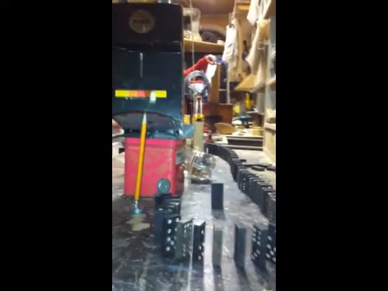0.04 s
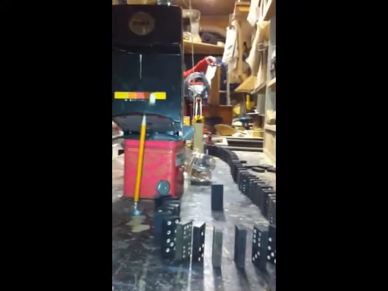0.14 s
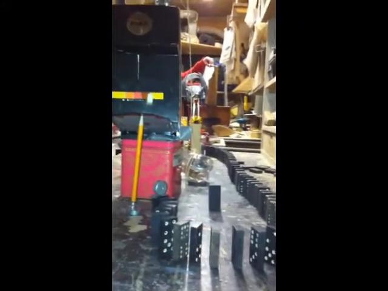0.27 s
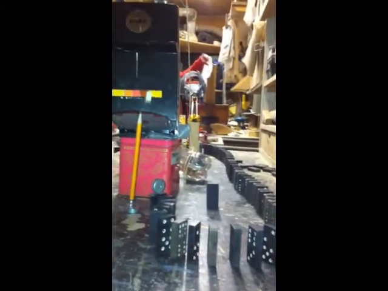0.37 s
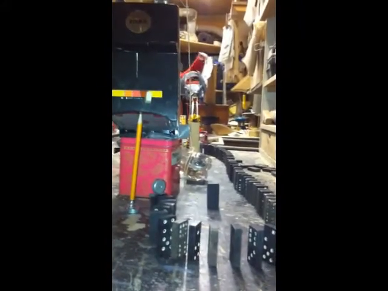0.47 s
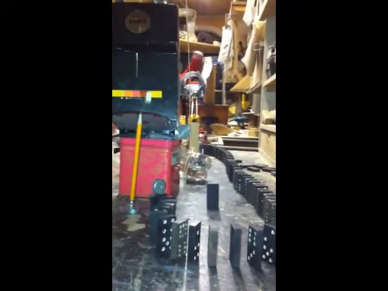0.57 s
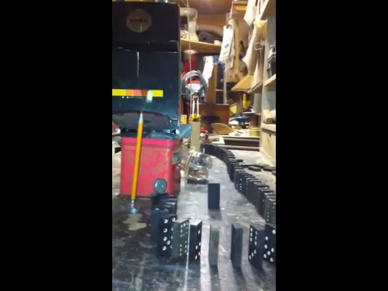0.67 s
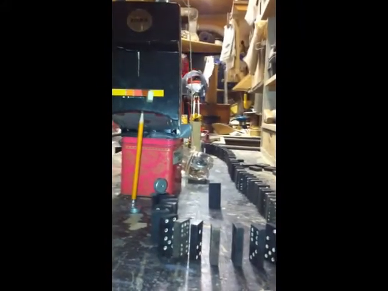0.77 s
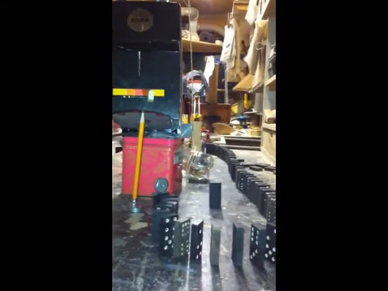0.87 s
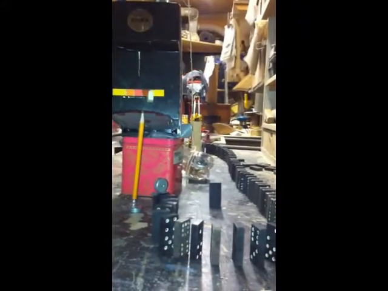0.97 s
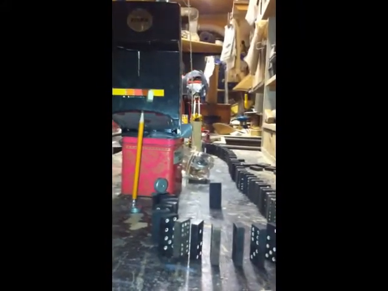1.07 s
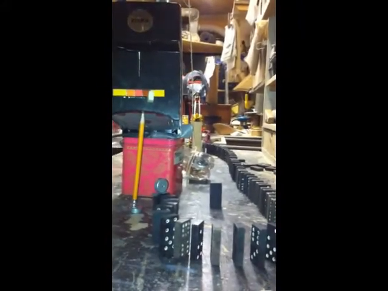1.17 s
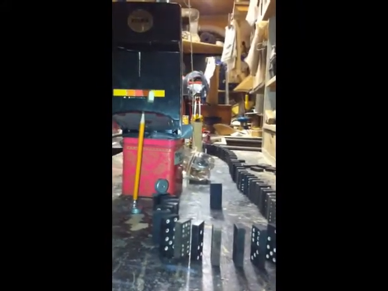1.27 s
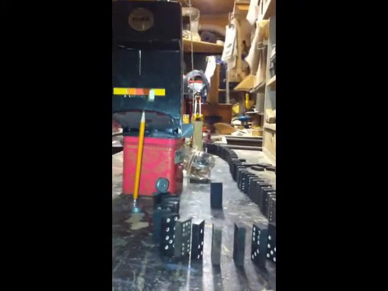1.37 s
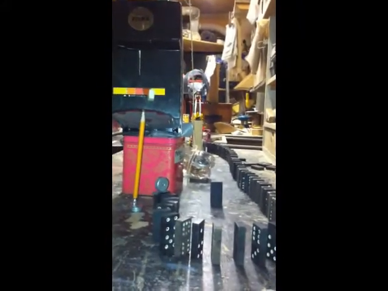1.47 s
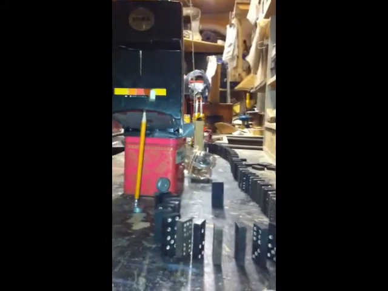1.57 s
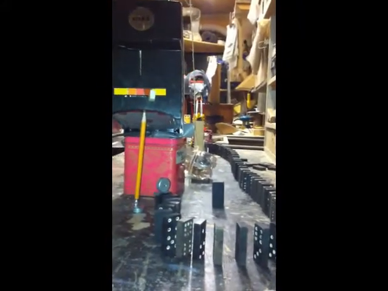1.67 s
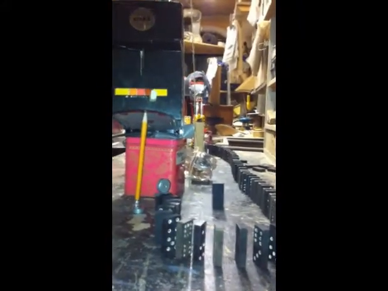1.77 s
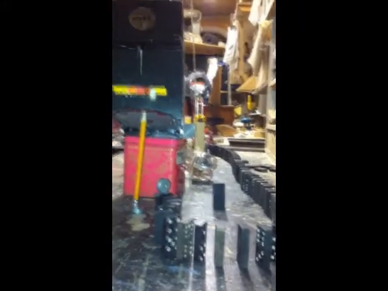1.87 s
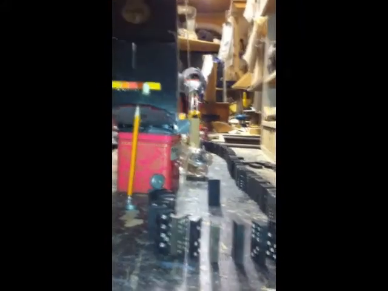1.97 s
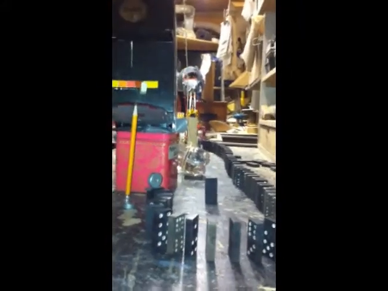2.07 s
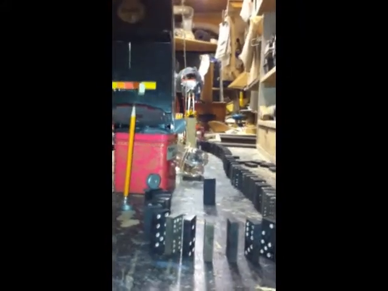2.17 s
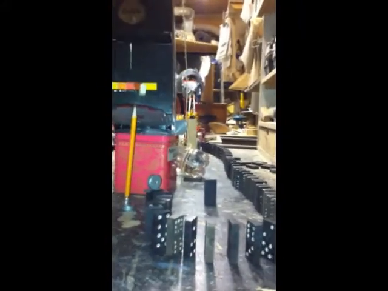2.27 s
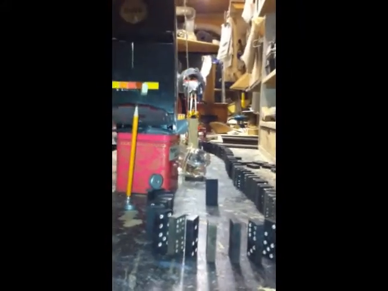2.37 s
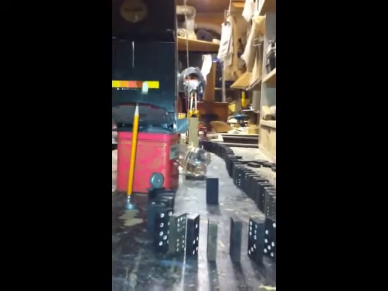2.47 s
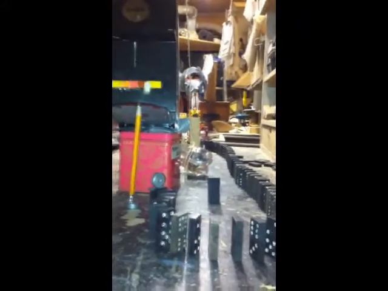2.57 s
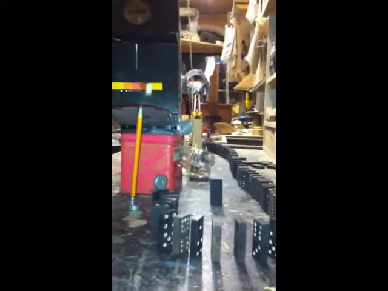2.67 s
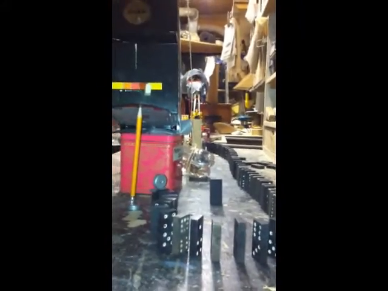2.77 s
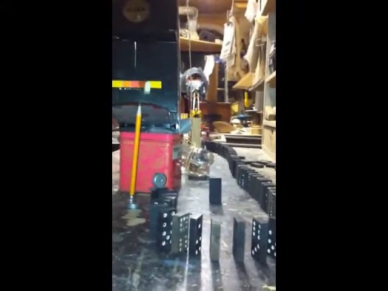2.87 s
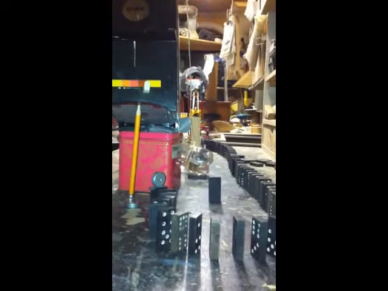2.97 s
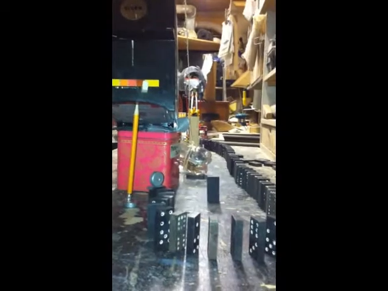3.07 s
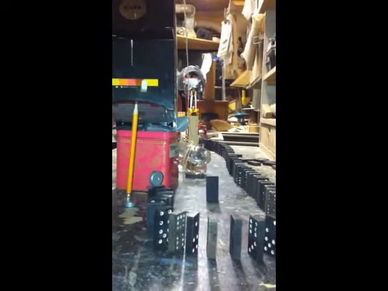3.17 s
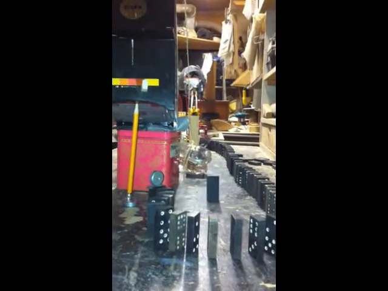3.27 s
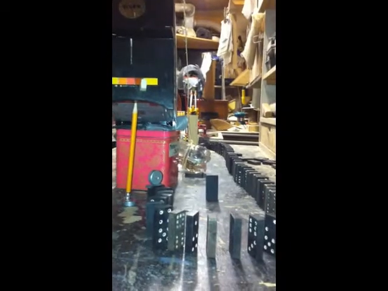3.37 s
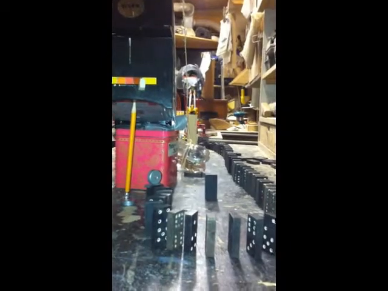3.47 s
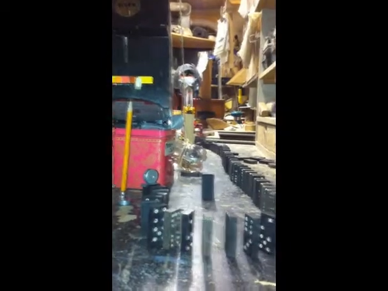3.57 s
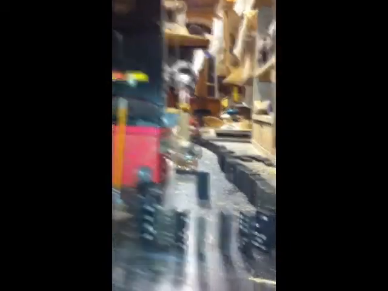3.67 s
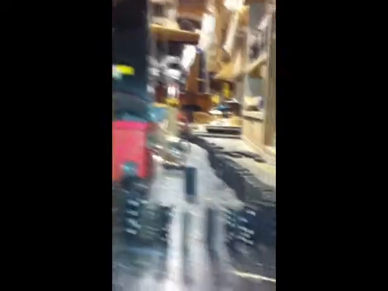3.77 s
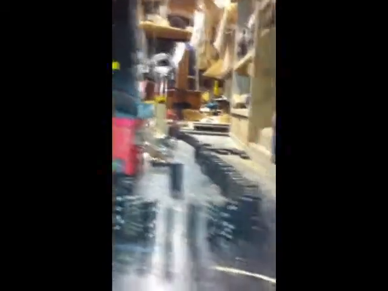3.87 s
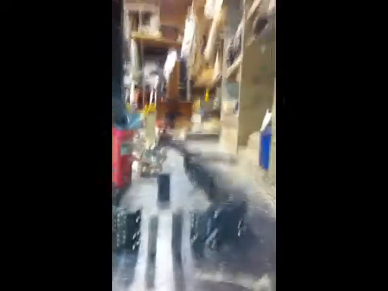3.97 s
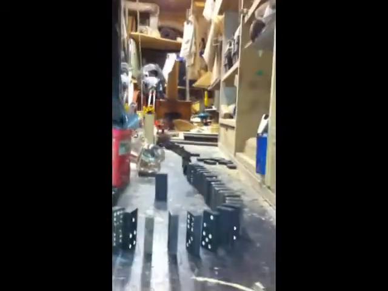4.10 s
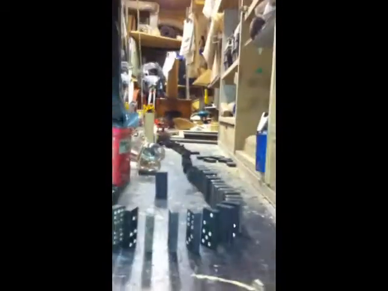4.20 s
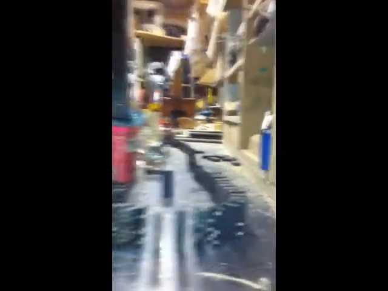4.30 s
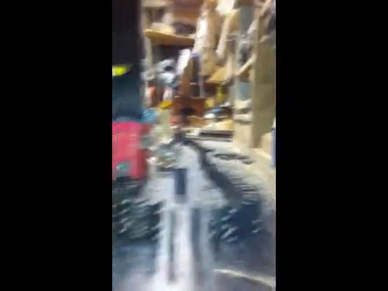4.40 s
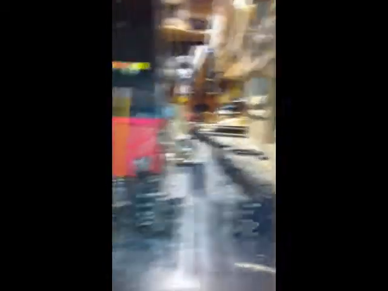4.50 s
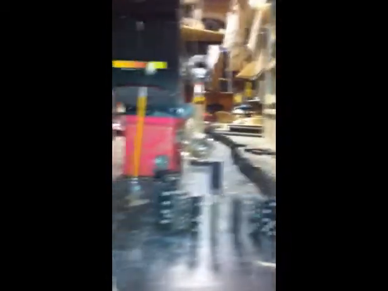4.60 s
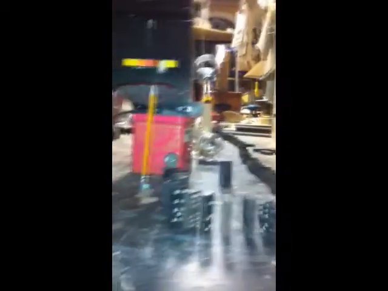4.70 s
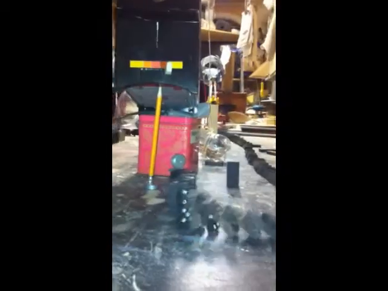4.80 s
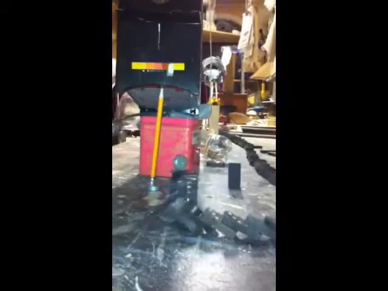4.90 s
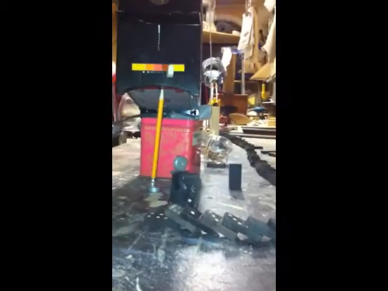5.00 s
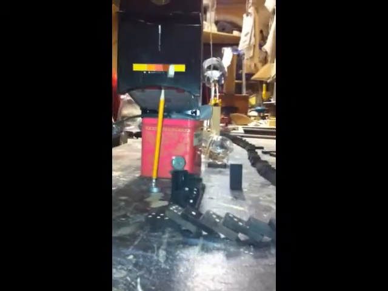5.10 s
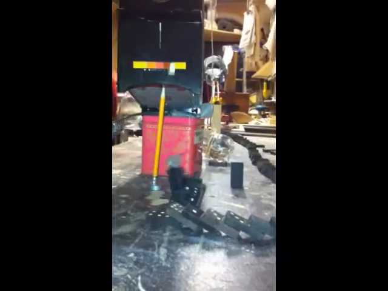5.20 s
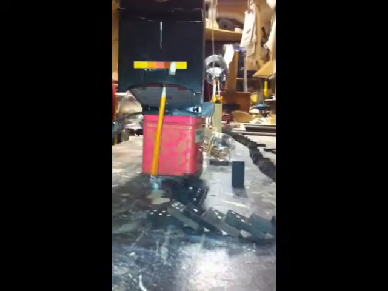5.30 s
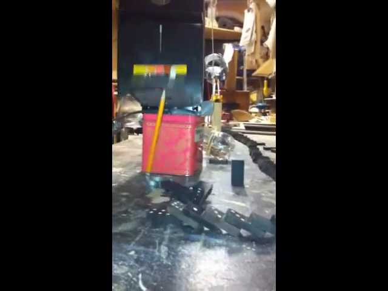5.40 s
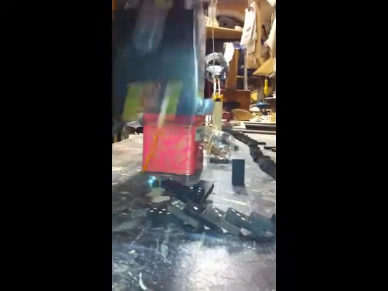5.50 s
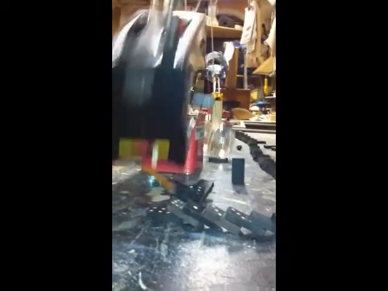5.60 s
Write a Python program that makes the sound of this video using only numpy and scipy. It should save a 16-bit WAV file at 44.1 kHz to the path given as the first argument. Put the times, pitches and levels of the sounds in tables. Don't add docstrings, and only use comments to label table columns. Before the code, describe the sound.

Distant wooden knocks and ticks, a loud accelerating ball bounce, a fast rattling cascade of dominoes on a bench, ending in a hard metallic double bang.

```python
import sys
import numpy as np
from scipy import signal
from scipy.fft import rfft, irfft, next_fast_len
from scipy.io import wavfile
from scipy.ndimage import uniform_filter1d, map_coordinates

SR = 44100
rng = np.random.default_rng(int(sys.argv[2]) if len(sys.argv) > 2 else 0)


def materialize(psi):
    bounded = np.clip(np.atleast_2d(psi).T, -1, 1)
    quanta = np.round(bounded * 32767).astype(np.int16)
    wavfile.write(sys.argv[1], SR, quanta)


def linear_from_db(decibels):
    return 10 ** (np.asarray(decibels, float) / 20)


N = 249165

# resonance in Hz, width in Hz, level in dB.
BENCH_MODES = [(805, 283, -5.5), (1000, 22, -2), (1113, 47, -0.5), (1310, 340, -6.5), (1850, 430, -6),
               (2100, 3600, -19.5)]
# resonance in Hz, width in Hz, level in dB.
FRAME_MODES = [(101, 27, -16), (228, 30, 2), (340.5, 83, 6), (540, 1010, -2)]
# frequency in Hz, level in dB per Hz.
CLICK_COLOUR = [(1200, -19.5), (2500, -4), (3800, 1), (5300, -3), (7500, -4.5), (10000, -17.5),
                (14000, -22.5)]
# frequency in Hz, level in dB per Hz.
RAIL_COLOUR = [(1200, -13), (2500, -7.5), (4000, -4), (5500, -3), (7500, -6), (10000, -11.5), (14000, -21)]


def unit(x):
    return x / np.sqrt(np.mean(x ** 2) + 1e-20)


def along(points, hz):
    f, v = np.transpose(points)
    return np.interp(np.log(hz + 1), np.log(f + 1), v)


def filtered(x, response):
    m = 2 * next_fast_len(x.shape[-1] // 2 + 4096)
    spectrum = rfft(x, m) * response(np.fft.rfftfreq(m, 1 / SR))
    return irfft(spectrum, m)[..., :x.shape[-1]]


def coloured(spectrum):
    def response(hz):
        cepstrum = irfft(np.log(linear_from_db(along(spectrum, hz))))
        cepstrum[1:len(hz) - 1] *= 2
        cepstrum[len(hz):] = 0
        return np.exp(rfft(cepstrum))
    return response


def resonance(f, centre_hz, width_hz):
    return 1j * f * width_hz / (centre_hz * centre_hz - f * f + 1j * f * width_hz)


def body(modes):
    top_hz = 1.6 * modes[-1][0]

    def response(f):
        total = sum((-1) ** k * linear_from_db(db) * resonance(f, c, w) for k, (c, w, db) in enumerate(modes))
        return total / (1 + 1j * f / top_hz) ** 3
    return response


def placed(times, peak_db, sounds):
    at = np.round(np.asarray(times) * SR).astype(int)[:, None] + np.arange(sounds.shape[1])
    sized = sounds / np.abs(sounds).max(axis=1, keepdims=True) * linear_from_db(peak_db)[:, None]
    return np.bincount(at.ravel(), sized.ravel(), N + SR)[:N]


def strikes(times, peak_db, response, t60, blow, rise_s=.0001):
    lead = 40
    t = np.arange(SR // 6) / SR
    chatter = rng.standard_normal((len(times), len(t)))
    chatter *= linear_from_db(-60 * t / np.clip(np.reshape(t60, (-1, 1)), .002, .3))
    chatter *= 1 - np.exp(-t / np.clip(rise_s, 1e-5, .01))
    chatter[:, 0] += blow
    sounds = filtered(np.pad(chatter, ((0, 0), (lead, 0))), response)
    return placed(np.asarray(times) - lead / SR, peak_db, sounds)


def clicks(s, db, shine_db, t60, blow, patchy_db, rise_s=.0001, colour=CLICK_COLOUR):
    # frequency in Hz, level in dB per Hz.
    shine = [(5500, -17.5), (8000, -5.5), (10500, 0), (13000, -3.5), (15300, -8), (16200, -63.5)]
    patches = rng.standard_normal((len(s), 16))

    def patchy(spectrum):
        def response(hz):
            patch = np.array([np.interp(hz, np.linspace(0, SR / 2, len(p)), p) for p in patches])
            return coloured(spectrum)(hz) * linear_from_db(patchy_db * patch)
        return response

    crack = strikes(s, db, patchy(colour), t60, blow, rise_s)
    return crack + strikes(s, db + shine_db, patchy(shine), t60, blow, rise_s)


def air():
    # frequency in Hz, level in dB per Hz.
    air_colour = [(15, -99), (25, 4), (397, 11), (480, -6), (521, 6.5), (1720, 0), (10600, -7.5),
                  (15000, -4), (16300, -44)]
    return linear_from_db(-62.5) * unit(filtered(rng.standard_normal(N), coloured(air_colour)))


def rolling():
    # time in seconds, rolling in dB, sliding in dB over rolling.
    roll = [(0, -80, -9), (.32, -65, 4), (0.649, -58.5, 5.5), (1.23, -56, 5), (1.4, -46, 12),
            (1.511, -56, 6), (1.68, -53.5, -3), (1.79, -47, 1), (1.82, -45, -1), (2.27, -47.5, 9),
            (2.56, -51, -22), (2.83, -97, 5), (3.1, -59, -6)]
    # time in seconds, rolling in dB, sliding in dB over it.
    shove = [(3.2, -51.5, 9), (3.45, -36, 0.5), (3.87, -50.5, 8.5), (4.11, -54, 13), (4.65, -38, -22),
             (5.05, -33, -32), (5.19, -47.5, -31), (5.65, -44.5, 1)]
    # frequency in Hz, level in dB per Hz.
    scrape = [(1470, -54), (2500, -13), (4440, -22.5), (5270, -21.5), (11500, -28.5), (14800, -28),
              (16000, -12.5)]
    s, roll_db, slide_db = np.transpose(roll + shove)
    rumble_db = -58.5 + 0.45 * (roll_db + 52.0) + 11 * (s >= shove[0][0])
    layers = [(rumble_db, body(FRAME_MODES)), (roll_db, body(BENCH_MODES)),
              (roll_db + slide_db, coloured(scrape))]
    out = np.zeros(N)
    for db, response in layers:
        lumps = map_coordinates(rng.standard_normal(700), [np.arange(N) * 120 / SR])
        grit = rng.standard_normal(N) * linear_from_db(2.75 * lumps)
        level = linear_from_db(np.interp(np.arange(N) / SR, s, db) - 9.5)
        out += level * unit(filtered(grit, response))
    return out


def ball_run():
    # time in seconds, knock peak in dB, thud and tick in dB over it,
    # length t60 in seconds.
    knocks = [(0.0309, -61.5, 7, -8, 0.098), (0.4915, -42, -1.5, -14, 0.076), (0.503, -46, -6, -11, .05),
              (0.7532, -68.5, 11, 7, 0.21), (0.7815, -57.5, -5.5, 1, 0.27), (0.8701, -51, -5, -5, 0.084),
              (1.3093, -33, -11.5, -18, 0.06), (1.3311, -51.5, 1, -2, 0.19), (1.5685, -57.5, 1, -15, 0.094),
              (1.9021, -42, -12, -6, 0.037), (1.9575, -40.5, -15, -9.5, 0.15),
              (2.3916, -41.5, -2.5, 3, 0.13), (2.807, -67.5, 11, 2, 0.056)]
    # time in seconds, tick peak in dB, shine and knock in dB
    # over it, length t60 in seconds.
    ticks = [(0.4105, -56, -1, 8, 0.07), (.426, -52, -3, -1, 0.46), (0.4557, -52.5, -6, 9, 0.43),
             (1.048, -59, 2, -22.5, 0.18), (1.1914, -27, -9, -11.5, 0.026),
             (1.2552, -38.5, -14, -0.5, 0.01), (1.287, -41, -15, -3.5, 0.027),
             (1.372, -26.5, -2.5, -7, 0.069), (1.4529, -40.5, -6, -1.5, 0.11), (1.703, -51, -17, -1, 0.019),
             (1.8113, -44, -1.5, -9, 0.34), (2.1776, -38, 1.5, 3.5, .11), (2.2584, -39.5, -13, -1, 0.12),
             (2.3141, -39.5, 5.5, 2, 0.061), (2.366, -34.5, 17.5, -0.5, 0.034),
             (2.798, -44.5, -4, -2.5, 0.11), (2.8585, -43.5, 1, -1, 0.036), (2.879, -38.5, -2, -8.5, 0.034),
             (2.917, -42, 9, -7, 0.024), (2.953, -45.5, 6.5, -10, 0.018)]
    knock_shine_db, tick_thud_db = -2.5, -15
    dull = [(s, db + tick, knock_shine_db, db, db + thud, t60) for s, db, thud, tick, t60 in knocks]
    bright = [(s, db, shine, db + knock, db + knock + tick_thud_db, t60)
              for s, db, shine, knock, t60 in ticks]
    s, db, shine_db, knock_db, thud_db, t60 = np.transpose(dull + bright)
    knock = strikes(s, knock_db - 0.2, body(BENCH_MODES), 1.16 * t60, blow=1.2, rise_s=0.0026)
    thud = strikes(s, thud_db + 9.0, body(FRAME_MODES), 0.58 * t60, blow=5.3)
    tick = clicks(s, db + 0.045, shine_db + 0.091, t60, blow=.7, patchy_db=5.0, rise_s=0.0008,
                  colour=RAIL_COLOUR)
    return tick + knock + thud


def bounces():
    # time in seconds, peak in dB, tick in dB over the peak.
    bounce = [
        (3.049, -.5, -27),
        (3.2172, -5.5, -36),
        (3.3018, -8.5, -40),
        (3.3655, -13, -30),
        (3.405, -16, -20),
        (3.4392, -18, -30),
        (3.4667, -21, -30),
        (3.489, -23, -32),
        (3.507, -27, -30),
        (3.530, -24, -30),
    ]
    # resonance in Hz, width in Hz, level in dB.
    board = [(306, 140, -17), (800, 110, -2), (1280, 140, 2), (1740, 150, -11), (2210, 190, -2),
             (3050, 260, -2)]
    # resonance in Hz, width in Hz, level in dB.
    shelf = [(920, 820, 1), (1960, 910, 4.5), (3070, 1600, -2.5)]
    s, db, tick_db = np.transpose(bounce)
    contact_hz = 5200 * linear_from_db(.22 * db)[:, None]

    def soft(modes):
        def response(hz):
            ratio = hz / contact_hz
            return body(modes)(hz) / (1 + 1.2j * ratio - ratio ** 2) ** 2
        return response

    blow = strikes(s - .0007, db + 2, soft(board), .008, blow=14)
    wall = strikes(s + .0058, db - 9.5, soft(board[:3]), 0.008, blow=10)
    shiver = strikes(s + 0.001954, db - 15, soft(shelf), 0.12, blow=0, rise_s=0.0025)
    tick = clicks(s, db + tick_db - 7, -30, 0.05, blow=0, patchy_db=2.5, rise_s=.003)
    return blow + wall + shiver + tick


def tile_clicks(s, db, shine_db, knock_db, hz):
    chance = rng.standard_normal((len(s), 3))[:, :, None]
    modes = [(hz[:, None], 260, 0),
             (5250 * (1 + 0.033 * chance[:, 0]), 300, 2.5 * chance[:, 1] - 3),
             (6700 * (1 + 0.074 * chance[:, 2]), 400, -9)]

    def tile(f):
        return sum(linear_from_db(level_db) * resonance(f, c, w) for c, w, level_db in modes)

    far = np.where(s > 3.5, np.clip(4.3 - s, 0, 1), 0)
    knock = strikes(s + .0015, db + knock_db - 1, body(BENCH_MODES), 0.024, blow=9)
    crack = clicks(s, db - 1, shine_db + 2.5 - 6 * far, .008 + .03 * far, blow=3 - 3 * far,
                   patchy_db=4.5, rise_s=.0003)
    ring = strikes(s, db - 4.5 - 6 * far, tile, .016, blow=1.75, rise_s=0.0016)
    return ring + crack + knock


def tiles():
    # time in seconds, click peak in dB, shine and
    # knock in dB over it, ring in Hz.
    shaken = [
        (1.8142, -37.5, 17, 3, 5700),
        (2.365, -52, -10, -26, 6940),
        (3.0422, -20.5, -38, -10, 4600),
        (3.314, -32.5, -17, -15, 5700),
    ]
    # time in seconds, click peak in dB,
    # slap peak in dB, tile ring in Hz.
    far_tiles = [(3.5289, -33, -21.5, 7950), (3.557, -30.5, -19, 3660), (3.576, -35, -31, 5100),
                 (3.6013, -36, -23, 4160), (3.6449, -30, -21, 4550), (3.6833, -32.5, -34, 4100),
                 (3.725, -41, -20.5, 6700), (3.7596, -30, -21.5, 6400), (3.785, -49, -24, 4910),
                 (3.804, -35.5, -23, 4130), (3.8497, -27.5, -22, 3960), (3.889, -23.5, -17.5, 6260),
                 (3.923, -31, -21.5, 4000), (3.9307, -28, -19, 4240), (3.9659, -25.5, -20.5, 5440),
                 (4.0042, -26.5, -17.5, 4600), (4.0486, -25, -27, 4000), (4.086, -24, -21, 5300),
                 (4.1176, -25, -20.5, 5280), (4.15, -25.5, -18, 5640), (4.1658, -30, -18, 5400),
                 (4.1879, -19.5, -16, 4450), (4.224, -25, -20, 5960), (4.2546, -27.5, -24, 7460),
                 (4.2843, -24, -24, 8150), (4.3175, -27.5, -27.5, 5040)]
    # time in seconds, click peak in dB, shine in dB over it, ring in Hz.
    near_tiles = [(4.3459, -26, 1, 4770), (4.376, -23, 0.5, 4600), (4.4051, -23, -5, 6900),
                  (4.442, -33, -11, 4500), (4.4719, -25.5, -36, 6650), (4.4991, -20.5, -4, 6970),
                  (4.5282, -28, -6, 6500), (4.549, -24, 5, 5700), (4.6058, -21, -3, 4570),
                  (4.631, -24, -6, 6740), (4.658, -23.5, -26, 8000), (4.6959, -23, -34, 7400),
                  (4.7214, -30, -13, 4120), (4.747, -22, -5, 5170), (4.774, -24, -5, 4500),
                  (4.8, -22.5, 0.5, 6140), (4.8273, -20.5, -6, 5850), (4.8683, -18, -19, 5160),
                  (4.8983, -17, -7, 6900), (4.9256, -13, -7, 6250), (4.947, -14.5, -10, 6040),
                  (4.976, -23.5, -6, 5800), (5.006, -28, -24, 4500), (5.037, -20, -13, 5100),
                  (5.0719, -22.5, -3, 5100), (5.1016, -22, -11, 5710), (5.1339, -16, 2.5, 6800),
                  (5.1713, -17.5, -36, 5000)]
    # time in seconds, thud peak in dB.
    thumps = [(0.496, -33.5), (1.4, -45), (2.189, -45.5), (2.388, -50), (3.689, -62), (3.902, -28.5),
              (4.204, -41.5), (5.134, -33)]
    # resonance in Hz, width in Hz, level in dB.
    leg = [(115, 10, -5.5), (212, 170, 0), (354, 555, -2)]
    # time in seconds, click peak in dB, shine in dB over it.
    rebounds = [(3.5682, -47, -17), (3.6267, -50, -11), (3.8965, -44, 9), (3.9744, -37, 2),
                (3.9854, -35, -19), (4.0537, -41, -7), (4.0897, -25.5, -18), (4.1044, -38, -34),
                (4.1229, -30, -4), (4.326, -34, -13), (4.349, -21, -6), (4.391, -38, -18),
                (4.506, -35, -21), (4.5334, -23.5, -1.5), (4.5744, -31, -3), (4.6422, -41, 8),
                (4.762, -42, 6), (4.838, -26, -5), (4.8604, -25, -5), (4.8769, -26, 6),
                (4.8879, -23.5, -15), (4.9319, -20, 1), (4.9428, -33, -13), (4.9589, -23, 1),
                (4.9686, -52, -21), (5.0762, -18, -22), (5.0804, -17, -6), (5.0904, -20.5, -17),
                (5.1233, -21, -24)]
    # time in seconds, click peak in dB, shine and knock in dB over it,
    # ring in Hz.
    loose = [(3.099, -39, -32, 6, 5600), (3.141, -41.5, -31, 11, 5400), (3.1722, -41.5, -28, 8, 5640),
             (3.406, -20, -26, 4.5, 6460), (3.519, -43, -26, 21.5, 7860), (5.188, -20.5, -34, -8, 5500),
             (5.226, -54, -17, 15, 5630), (5.304, -37, -45, -20, 5600), (5.361, -48, -25, 4, 5960),
             (5.378, -50, -22, 5, 4870), (5.391, -44, -22, 0, 4470), (5.424, -52, -14, -3, 5200),
             (5.5166, -22, -10, -6, 5570), (5.5745, -40, -21, -5, 5930)]

    far = [(s, db, -24.5 + 17 * (s > 4.04), slap, hz) for s, db, slap, hz in far_tiles]
    near = []
    for s, db, shine, hz in near_tiles:
        slap_db = -27 + .45 * (db + 35.0) + rng.normal(0, 1.5)
        slap_db += -5 * (s > 4.56)
        near.append((s, db, shine, slap_db, hz))
    s, db, shine_db, slap_db, hz = np.transpose(far + near)
    thud_db = -43 + 4.5 * rng.standard_normal(len(s))
    thud = strikes(s, thud_db, body(FRAME_MODES), 0.073, blow=3.4)
    thud += strikes(*np.transpose(thumps), body(leg), 0.017, blow=5.4)

    back = []
    for t, level, shine in rebounds:
        knock_db = -30.5 + (0.31 - 1) * level + 0.31 * 28
        back.append((t, level, shine, knock_db, hz[s < t][-1]))
    falling = tile_clicks(s, db, shine_db, slap_db - db - 3.5, hz)
    return falling + thud + tile_clicks(*np.transpose(back + loose + shaken))


def landings():
    # time in seconds, peak in dB, bench note in Hz.
    flat_falls = [(3.529, -24, 950), (3.558, -19.5, 1150), (3.577, -21, 990), (3.601, -21.5, 1310),
                  (3.645, -26, 1660), (3.685, -24, 703), (3.685, -23.5, 940), (3.724, -29, 1250),
                  (3.762, -28, 680), (3.769, -26, 1190), (3.805, -41, 960), (3.85, -17.5, 1150),
                  (3.889, -14, 1140), (3.93, -19.5, 1260), (3.964, -14.5, 1170), (4.005, -19.5, 1070),
                  (4.049, -29, 1130), (4.084, -18.5, 940), (4.116, -32, 840), (4.149, -27, 1120),
                  (4.186, -20, 805), (4.222, -22.5, 750), (4.249, -21.5, 1060), (4.283, -25, 960),
                  (4.317, -30, 953), (4.348, -21.5, 1090), (4.373, -20.5, 1130), (4.402, -20, 1100),
                  (4.445, -21, 970), (4.471, -25, 1310), (4.499, -20, 1270), (4.55, -34, 1130),
                  (4.583, -32, 1140), (4.604, -27, 1160), (4.63, -51, 1100), (4.661, -27.5, 840),
                  (4.694, -29, 840), (4.724, -25.5, 890), (4.766, -40, 842), (4.799, -21.5, 766),
                  (4.832, -24, 1200), (4.862, -34, 1340), (4.873, -33, 794), (4.902, -33, 1130),
                  (4.924, -37, 1550), (4.935, -22, 1180), (4.947, -21, 1150), (4.978, -28, 1170),
                  (5.008, -40, 970), (5.037, -24.5, 1200), (5.074, -26, 1750), (5.133, -10, 1230),
                  (5.17, -18.5, 834), (5.221, -28.5, 824)]
    s, db, hz = np.transpose(flat_falls)
    spot = body([(300, 200, -14), (hz[:, None], 140, 0), (2300, 1500, -13)])
    return strikes(s, db - 5.5, spot, 0.033, blow=8.9, rise_s=0.0014)


def slam():
    # time in seconds, peak in dB, crack in dB over the peak.
    hits = [(5.4418, -14, -14), (5.453, -15, -14), (5.4560, -1, -11), (5.4608, -12, -14),
            (5.4700, -24, -14), (5.4751, -2, -8), (5.4795, -14, -20), (5.490, -18, -18), (5.5048, -14, -19),
            (5.524, -25, -14), (5.600, -41, -11), (5.626, -46, 5), (5.639, -20, -4)]
    # resonance in Hz, width in Hz, level in dB.
    tin = [(533, 210, -9), (1200, 74, 0.5), (1648, 290, -0.5), (1917, 135, 5), (2790, 170, -14.5),
           (3360, 130, -7.5), (4600, 260, -13.5)]
    # time in seconds, peak in dB.
    rattle = [(5.4495, -14), (5.4635, -13), (5.4665, -23), (5.4825, -13), (5.4855, -34), (5.4955, -28),
              (5.499, -33), (5.5115, -21), (5.5145, -14.5), (5.520, -42), (5.538, -39), (5.560, -32),
              (5.594, -35), (5.6445, -22.5)]
    # resonance in Hz, width in Hz, level in dB.
    lid = [(690, 200, -14), (1140, 96, -5.5), (1500, 180, -11), (3180, 450, -16)]
    s, db, crack_db = np.transpose(hits)
    clang = strikes(s, db + 0.084, body(tin), 0.0097, blow=17, rise_s=.0006)
    clatter = strikes(*np.transpose(rattle), body(lid), 0.0056, blow=6.2)
    crack = clicks(s, db + crack_db - .1, -4.5, 0.036, blow=0.81, patchy_db=2.0, colour=RAIL_COLOUR)
    thud = strikes(s, db - 34, body(FRAME_MODES), 0.035, blow=6.1)
    return clang + clatter + crack + thud


def room(x):
    # frequency in Hz, decay t60 in seconds.
    decay = [(150, 0.29), (1000, 0.15), (4000, 0.2), (12000, 0.1)]
    step, delay = 4096, 130
    out = np.zeros(N + SR)
    for start in range(0, N, step):
        hz, t, z = signal.stft(rng.standard_normal(SR // 3), SR, nperseg=256)
        fade = linear_from_db(-60 * t / along(decay, hz)[:, None])
        tail = signal.istft(z * fade, SR, nperseg=256)[1]
        wet = signal.fftconvolve(x[start:start + step], tail / np.linalg.norm(tail))
        out[start + delay:][:len(wet)] += wet
    return out[:N]


def scene():
    far, ball, row, lever = ball_run(), bounces(), tiles() + landings(), slam()
    near_db = np.interp(np.arange(N) / SR, [4, 5], [0, -6])
    wet = linear_from_db(-4.0) * far + linear_from_db(-13.5) * ball + linear_from_db(-4.5 + near_db) * row + linear_from_db(-9.5) * lever
    return (far + ball + row + lever + room(wet) + rolling() + air())[None]


def thinned(x, edge_hz, gap_db, share, top_hz, top_share):
    hz, t, z = signal.stft(x[0], SR, nperseg=1024)
    power = np.abs(z) ** 2
    total = power.sum(axis=0)
    band = power[:512].reshape(128, 4, -1).sum(axis=1)
    luck = np.repeat(rng.random((129, len(t) // 2 + 1)), 2, axis=1)[:, :len(t)]
    faint = np.repeat((band < total * linear_from_db(-2 * gap_db)) & (luck[1:] < share), 4, axis=0)
    busy = total > linear_from_db(-2 * 44)
    lost_band = faint & (hz[:512, None] > edge_hz)
    lost_top = (hz[:512, None] > top_hz) & (luck[0] < top_share) & busy
    z[:512] *= np.where(lost_band | lost_top, .03, 1)
    return signal.istft(z, SR, nperseg=1024)[1][None, :N]


def starved(x, edge_hz, gap_db):
    top = filtered(x, lambda hz: 1 / (1 + (edge_hz / (hz + 1)) ** 16))
    slots = np.pad(top[0], (0, -N % 1024)).reshape(-1, 8, 128)
    level_db = 10 * np.log10(np.mean(slots ** 2, axis=2) + 1e-14)
    before = np.arange(8) < level_db.argmax(axis=1)[:, None]
    lost = before & (level_db < level_db.max(axis=1)[:, None] - gap_db)
    return x - top * uniform_filter1d(np.repeat(lost.ravel(), 128)[:N] * .96, size=64)


def top_cut(x):
    return signal.sosfilt(signal.butter(12, 16470, fs=SR, output="sos"), x)


def record(dry):
    clipped = dry / (1 + np.abs(dry) ** 8) ** (1 / 8)
    bass_hz, top_hz = 35, 15230
    mix = filtered(clipped, lambda hz: (1j * hz / (bass_hz + 1j * hz)) ** 2 / (1 + (hz / top_hz) ** 60))
    return top_cut(mix)


dry = scene()
out = record(dry)
materialize(out)
```